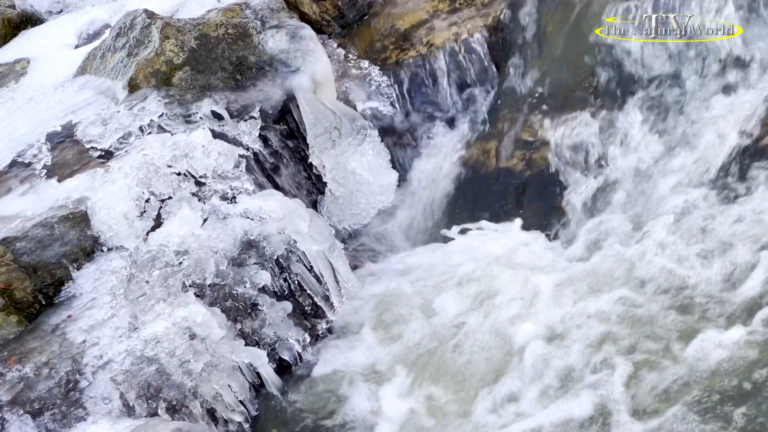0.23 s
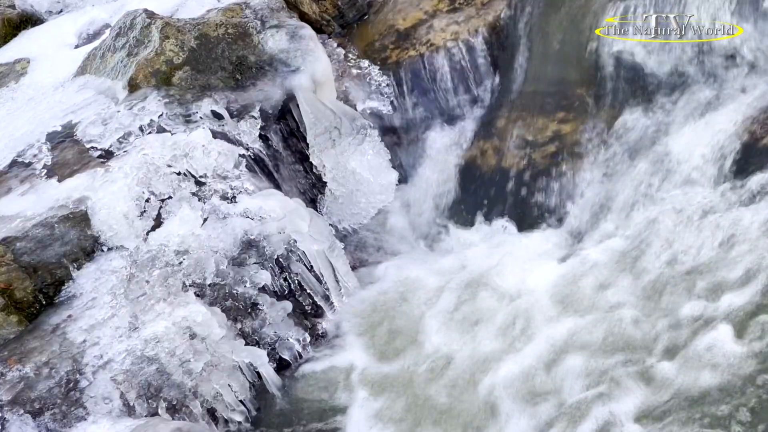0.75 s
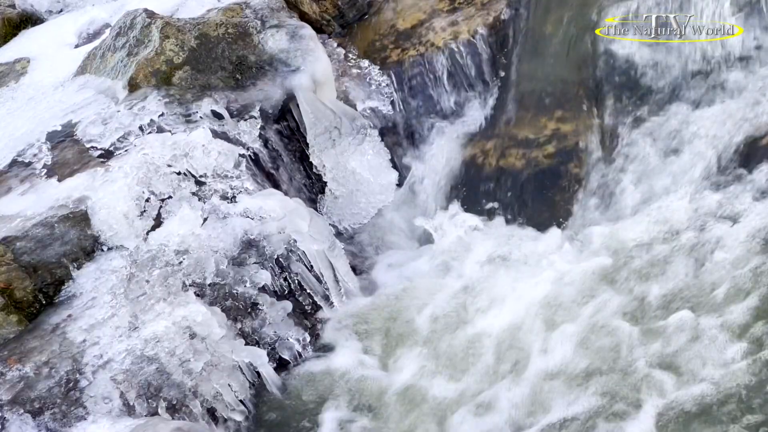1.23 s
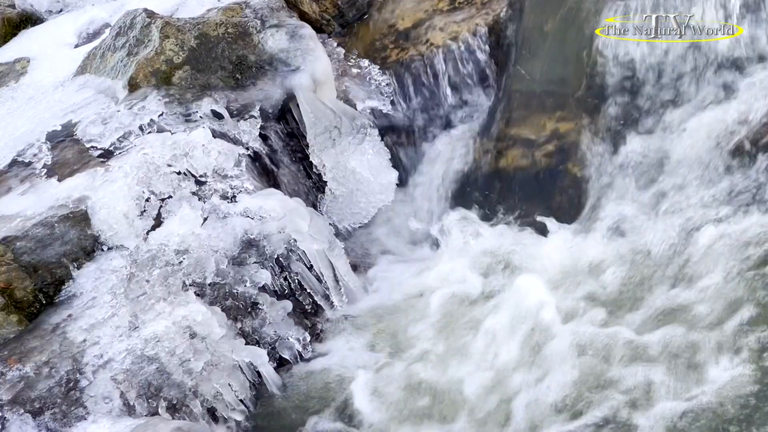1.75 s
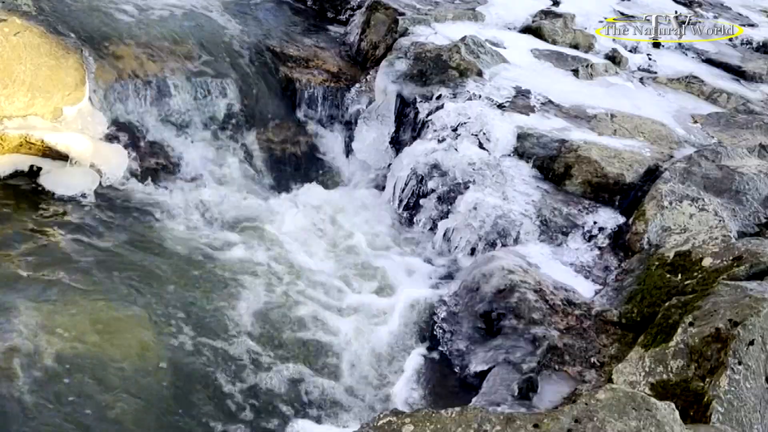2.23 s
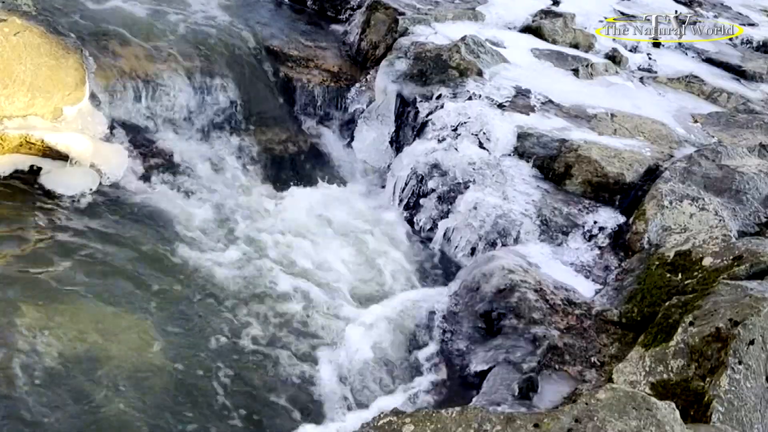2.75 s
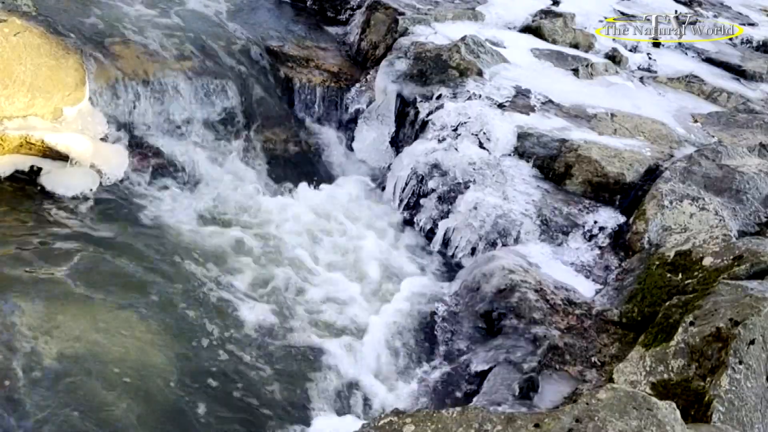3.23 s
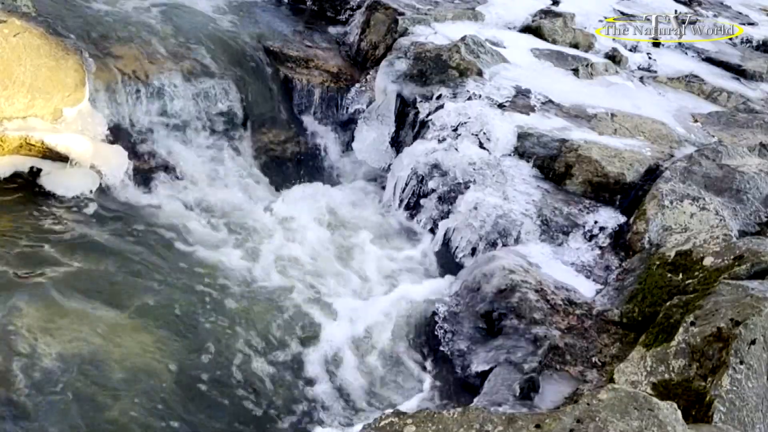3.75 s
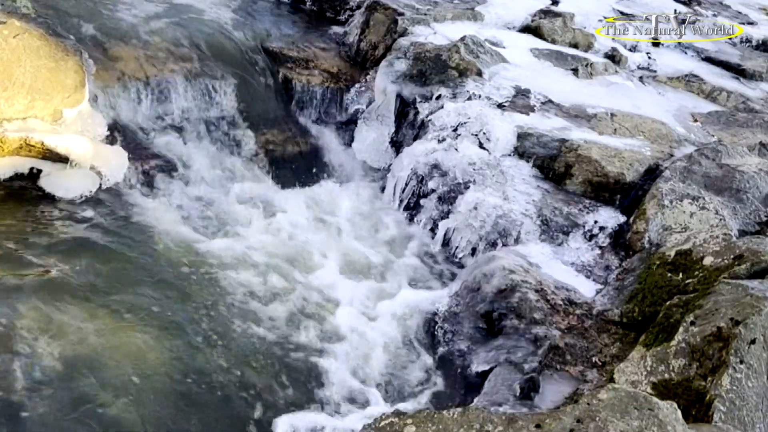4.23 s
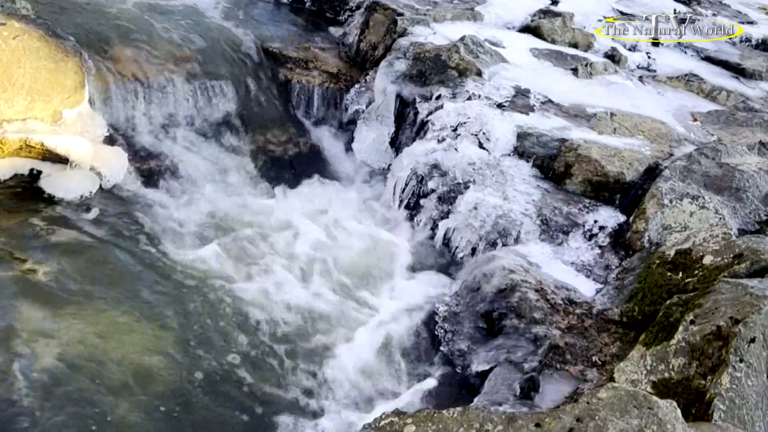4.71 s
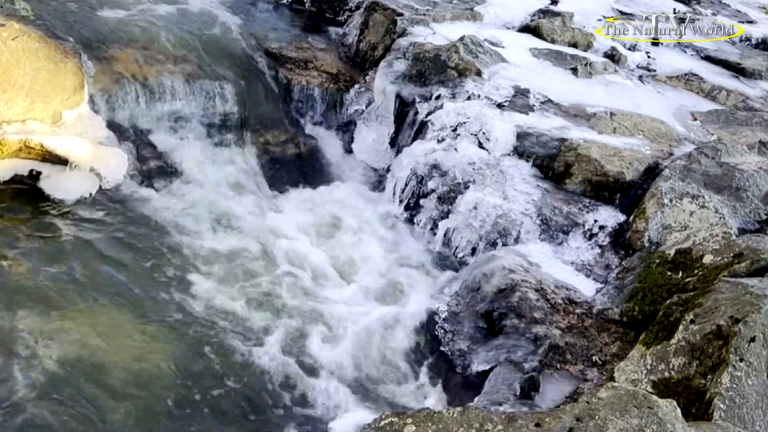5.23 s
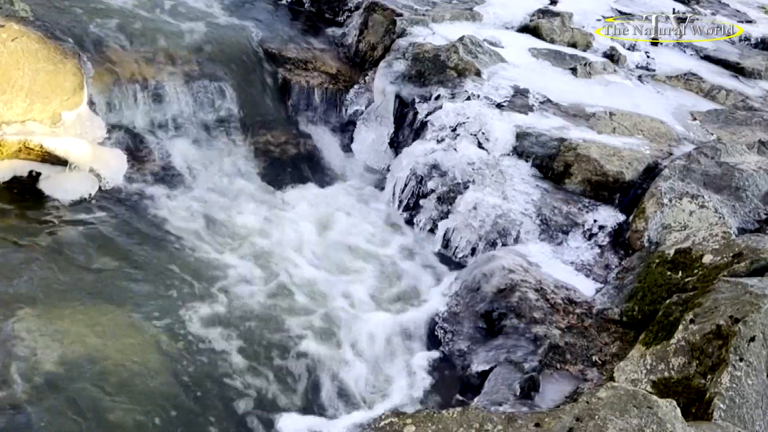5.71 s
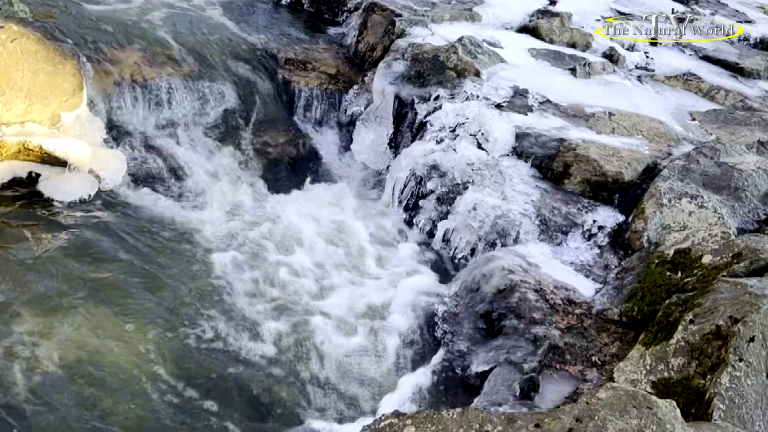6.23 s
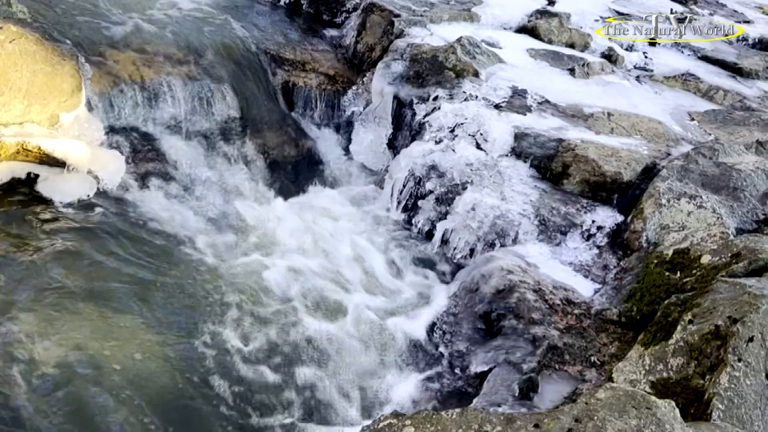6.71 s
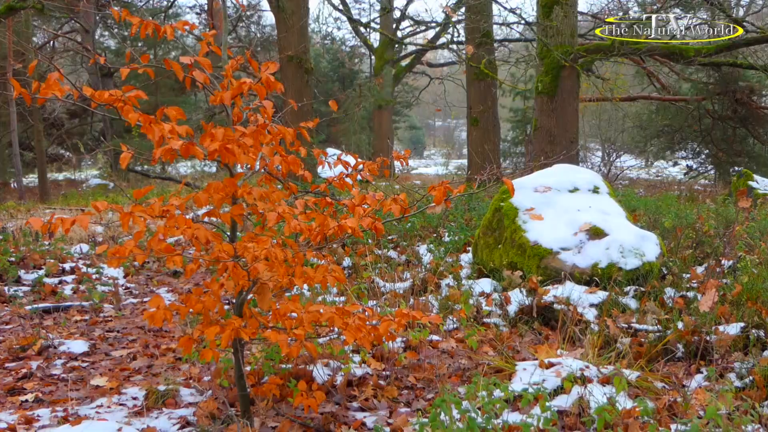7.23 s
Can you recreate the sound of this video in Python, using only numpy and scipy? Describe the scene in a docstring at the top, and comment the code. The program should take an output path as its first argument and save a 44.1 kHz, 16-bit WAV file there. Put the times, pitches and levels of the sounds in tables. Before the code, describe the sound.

A small, fast stream drops over icy rocks into a pool, heard very close and in mono. Countless bubbles gurgle and plop in the middle pitches while smaller ones tinkle brightly. Sharp droplets and little slaps on stone scatter irregularly over a continuous foamy rush, thin hiss and faint low rumble, outdoors, with only a tiny reflection from the stones.

```python
"""Bubbles gurgle, plop and tinkle where a small stream drops over icy rocks into a pool, close up, mono.
Each bubble is a damped sine whose pitch can climb; big ones gurgle, small ones tinkle.
Drops ring for a cycle or two; spray and slaps on stone are short bursts of coloured noise.
Noise also makes the foam's rush, the fine mist and the low rumble of the plunge.
A hollow between the rocks resonates, and the stones return a faint, changing echo."""
import sys
import numpy as np
from scipy import signal
from scipy.fft import rfft, irfft, next_fast_len
from scipy.io import wavfile
from scipy.ndimage import map_coordinates

SR = 44100
rng = np.random.default_rng(int(sys.argv[2]) if len(sys.argv) > 2 else 0)


def inscribe(sig):
    """Save sig as 16-bit PCM at rate SR to the path in sys.argv[1].

    A 1-D sig is mono; a 2-D sig holds one channel per row.
    Samples are clipped to [-1, 1] before scaling.
    """
    pcm = np.round(np.clip(np.atleast_2d(sig).T, -1, 1) * 32767)
    wavfile.write(sys.argv[1], SR, pcm.astype(np.int16))


N = 328986
TOP_HZ = 16300

# loudest bubbles: start_s, pitch_hz, level_db, life_cycles, rise_share_per_life
NEAR_BUBBLES = [(0.0465, 680, -23.5, 12, 0.071), (0.0854, 1410, -23.5, 15, 0.04),
                (0.118, 2031, -24, 6.7, 0.02), (0.2716, 1980, -19.5, 7, 0.01),
                (0.276, 3620, -17.5, 14, 0.0), (0.29, 623, -26, 13, 0.086), (0.346, 740, -25, 6.5, 0),
                (0.373, 913, -24, 11, 0.012), (0.454, 1430, -21, 15, 0.053), (0.5077, 502, -22, 9.1, 0.075),
                (0.543, 3000, -7.5, 5.3, 0.024), (0.544, 1770, -13.5, 4, 0.035),
                (0.561, 1080, -24, 20, 0.11), (0.568, 625, -26, 9.4, 0.032),
                (0.5864, 1705, -11, 6.7, 0.0097), (0.596, 670, -25, 9, 0.018), (0.674, 690, -23, 6.5, 0.0),
                (0.6747, 2360, -8, 8, 0.03), (0.675, 1490, -20, 7, 0.31), (0.739, 627, -29, 11, 0.02),
                (0.8208, 1450, -19.5, 8, 0.078), (0.932, 942, -16, 10.4, 0.099),
                (0.9442, 4050, -12.5, 7.5, 0.0), (0.975, 800, -15, 3.5, 0.062),
                (1.1214, 730, -24.5, 7.7, 0.0078), (1.1332, 1920, -15.5, 6, 0.0064),
                (1.1393, 917, -20, 17, 0.024), (1.162, 547, -24, 7, 0.012), (1.2324, 880, -19.5, 6, 0.11),
                (1.2362, 1416, -22.5, 20, 0.045), (1.261, 622, -22.5, 9.5, 0), (1.268, 860, -26, 11, 0.023),
                (1.3249, 680, -23, 8.8, 0.037), (1.342, 3120, -18.5, 6.7, 0.0),
                (1.3504, 599, -17.5, 10.4, 0.038), (1.393, 900, -24, 9.3, 0.1), (1.423, 980, -22, 7, 0.0),
                (1.431, 809, -15.5, 11.4, 0.047), (1.4637, 1030, -12.5, 8, 0.11),
                (1.464, 900, -23, 10, 0.02), (1.4917, 1510, -18, 12, 0.09), (1.492, 1007, -25, 18.6, 0.14),
                (1.525, 1025, -28, 13, 0.23), (1.5407, 1620, -10.5, 3.1, 0.0), (1.56, 1850, -25, 12, 0.064),
                (1.5809, 647, -15, 10, 0.0069), (1.6382, 906, -21.5, 10.5, 0.11),
                (1.71, 1540, -21.5, 9, 0.023), (1.9028, 623, -22.0, 12, 0.032),
                (1.956, 676, -27, 6, 0.0059), (1.9645, 1660, -14.5, 3.7, 0.017),
                (2.0092, 658, -16, 7.4, 0.0), (2.0532, 1000, -18.5, 7.3, 0.037),
                (2.061, 598, -25, 13, 0.075), (2.177, 2700, -18.5, 8.5, 0), (2.2903, 481, -22.5, 11, 0.21),
                (2.323, 960, -13.5, 9.1, 0.097), (2.3463, 1064, -24, 19, 0.084),
                (2.361, 1900, -20, 15, 0.065), (2.443, 1080, -22.5, 7.9, 0.031),
                (2.4596, 638, -18, 9.3, 0.011), (2.5853, 945, -19.5, 10, 0.032),
                (2.7483, 799, -20.5, 12, 0), (2.758, 1260, -19, 8.5, 0.043),
                (2.858, 878, -18.5, 9.1, 0.036), (2.859, 1800, -19.5, 5, 0), (3.031, 675, -29, 13, 0.02),
                (3.0864, 1140, -18, 5.5, 0.0), (3.206, 1117, -17, 11, 0.024),
                (3.223, 4800, -15.5, 9.2, 0.053), (3.25, 1950, -16.5, 4.4, 0.016),
                (3.303, 856, -19.5, 8.2, 0.0096), (3.331, 2340, -18.5, 5.4, 0.096),
                (3.4718, 822, -14.5, 11.3, 0.035), (3.4718, 699, -12, 11.6, 0.028),
                (3.664, 1477, -18, 9, 0.0), (3.7092, 902, -16.5, 10.5, 0.2),
                (3.7368, 2220, -13.5, 3, 0.021), (3.769, 654, -23, 8.4, 0.02),
                (3.7691, 1470, -16.5, 7.4, 0.034), (3.8093, 1058, -7.0, 11.7, 0.0065),
                (3.827, 1116, -17.5, 9.3, 0.23), (3.8713, 2620, -11, 5.9, 0.019),
                (3.8735, 633, -23, 13, 0.0), (3.987, 450, -24, 6.3, 0.11), (4.025, 625, -22, 12, 0.033),
                (4.037, 900, -21, 7.2, 0.065), (4.08, 474, -24, 5.2, 0), (4.1754, 2410, -18.5, 7, 0.01),
                (4.4018, 453, -23.5, 4.9, 0), (4.403, 2470, -22, 14, 0.0), (4.512, 705, -24.5, 6.7, 0.041),
                (4.625, 1200, -21.5, 11, 0.22), (4.6698, 678, -23.5, 12, 0.0084),
                (4.7163, 468.5, -12, 13, 0.068), (4.7248, 1710, -22.5, 12, 0.049),
                (4.726, 925, -22.5, 19, 0.048), (4.7517, 1430, -23, 14, 0.045), (4.7525, 800, -24, 14, 0.2),
                (4.7587, 606, -12, 6.4, 0.023), (4.7682, 796, -23, 15.5, 0.084), (4.783, 1490, -17.5, 9, 0),
                (4.816, 1850, -24, 16, 0.05), (4.832, 780, -19, 11, 0.024), (4.8611, 2580, -16.5, 11, 0.0),
                (4.9073, 1600, -20, 8.9, 0.041), (4.979, 1934, -18, 5.8, 0.048),
                (5.0808, 512, -20.5, 10, 0.027), (5.1046, 883, -21.0, 9.9, 0.01),
                (5.1453, 765, -25, 19.5, 0.12), (5.162, 1000, -17, 10, 0.01),
                (5.1646, 4700, -8.5, 2.6, 0.0), (5.167, 2250, -10.5, 4, 0.05), (5.174, 673, -22, 6.6, 0.21),
                (5.188, 1570, -22, 15, 0.055), (5.224, 2000, -16, 5.1, 0.0084),
                (5.254, 989, -23, 7.6, 0.0085), (5.278, 963, -23, 11, 0.22), (5.3289, 612, -6.5, 6.4, 0.0),
                (5.365, 1284, -25.5, 13, 0.15), (5.465, 1004, -19.5, 9.7, 0.03),
                (5.5063, 1410, -17, 7, 0.0), (5.537, 1530, -20, 7, 0.018), (5.5655, 2020, -9.5, 7.5, 0.0),
                (5.5863, 2050, -9, 6.8, 0.01), (5.6025, 1077, -19, 11, 0.15),
                (5.6154, 1336, -19.5, 8.4, 0.33), (5.6355, 700, -21, 5.6, 0.0),
                (5.702, 723, -20.5, 10, 0.03), (5.738, 1010, -24, 14, 0), (5.837, 826, -22, 7.8, 0.15),
                (5.883, 2530, -8, 2.6, 0.09), (5.9547, 1037, -21.0, 8.2, 0.11),
                (5.9665, 622, -14, 10.5, 0.25), (5.969, 5270, -11, 3, 0.0), (5.9802, 1140, -23, 10, 0.12),
                (5.9867, 867, -19, 14.5, 0.031), (6.01, 990, -17, 4.8, 0.21),
                (6.0454, 483, -23.5, 12.5, 0.037), (6.06, 4630, -10, 5.8, 0),
                (6.1423, 955, -19.5, 7.1, 0.062), (6.1713, 2680, -19.5, 9, 0.083),
                (6.2085, 890, -20, 12, 0.071), (6.2082, 1210, -22, 10, 0.043),
                (6.234, 2600, -19.5, 22, 0.052), (6.274, 5190, -14, 5.3, 0.06),
                (6.276, 1760, -16, 6.4, 0.014), (6.3139, 1690, -19, 11, 0.02),
                (6.3163, 4770, -20, 13, 0.02), (6.44, 1150, -19, 5.3, 0.052),
                (6.4971, 920, -19.5, 7.7, 0.12), (6.6732, 1083, -18, 8.6, 0.014),
                (6.7615, 2020, -14.5, 5, 0.071), (6.7923, 727, -22, 9.2, 0.021),
                (6.8418, 1390, -24, 22, 0.066), (6.895, 6200, -13.5, 5.9, 0.0065),
                (6.9297, 2500, -15, 10, 0.0), (6.9397, 564, -20, 8.7, 0.043),
                (6.9626, 884, -14.5, 9.2, 0.2), (6.98, 1300, -20, 12, 0.08), (6.995, 2080, -29, 11, 0.01),
                (7.0736, 505, -21.5, 11, 0.0), (7.1184, 616, -23.5, 11, 0.27),
                (7.163, 1404, -21.5, 10, 0.3), (7.1938, 1650, -22, 21, 0.038),
                (7.2427, 1440, -20.5, 12, 0.0), (7.27, 1073, -18.5, 11.6, 0.0),
                (7.282, 1360, -22, 6, 0.00024), (7.3215, 643, -18, 10.3, 0), (7.364, 1700, -22, 15, 0.05),
                (7.3868, 692, -13.5, 11.3, 0.017), (7.3876, 980, -14, 7, 0.021)]


def amp(db):
    """Decibels to gain."""
    return 10 ** (np.asarray(db) / 20)


def unit(x):
    """Scale x to rms 1."""
    return x / np.sqrt(np.mean(x ** 2) + 1e-20)


def along(points, hz):
    """Interpolate (Hz, value) points on a log-frequency axis."""
    point_hz, value = np.transpose(points)
    return np.interp(np.log(hz + 1), np.log(point_hz), value)


def wobble(knots_per_s):
    """Smooth random curve: a spline through Gaussian knots."""
    knots = rng.standard_normal(int(N * knots_per_s / SR) + 4)
    return map_coordinates(knots, [np.arange(N) * knots_per_s / SR])


def filtered(x, response):
    """Multiply the spectrum of x by response(hz)."""
    size = next_fast_len(N + SR // 4)
    hz = np.fft.rfftfreq(size, 1 / SR)
    return irfft(rfft(x, size) * response(hz), size)[:N]


def noise(spectrum):
    """Gaussian noise of rms 1, coloured by (Hz, dB) points."""
    white = rng.standard_normal(N)
    return unit(filtered(white, lambda hz: amp(along(spectrum, hz))))


def draw_times(when, surge):
    """Map uniform draws to samples, more densely where the water surges."""
    births = np.cumsum(surge)
    return np.searchsorted(births, when * births[-1])


def ring(start_s, hz, gain, cycles, rise):
    """Sum of bubbles: damped sines whose pitch changes by the share rise per life."""
    pinch_per_cycle = 2.4
    length = (6 * cycles / hz * SR).astype(int) + 1
    k = np.repeat(np.arange(len(hz)), length)  # bubble index of each sample
    age = np.arange(len(k)) - (np.cumsum(length) - length)[k]
    turns = age * hz[k] / SR
    lives = turns / cycles[k]
    # the ring sets in as the neck of air pinches off
    envelope = np.exp(-lives) * (1 - np.exp(-pinch_per_cycle * turns))
    phase = 2 * np.pi * turns * (1 + rise[k] * lives / 2)
    wave = gain[k] * envelope * np.sin(phase)
    return np.bincount((start_s * SR).astype(int)[k] + age, wave, N)[:N]


def plink(start_s, hz, db, cycles, rise):
    """Ringing bubbles, each with a short, higher snap as its neck closes."""
    snap_db, snap_ratio, snap_cycles = -15, 1.37, 1.8  # level and pitch against the bubble
    snap_life = np.full(len(start_s), snap_cycles)
    snap = ring(start_s, snap_ratio * hz, amp(db + snap_db), snap_life, rise)
    return snap + ring(start_s, hz, amp(db), cycles, rise)


def swarm(spectrum, surge, cycles, rise, spread_db, count):
    """Random bubbles of rms 1, dense in surges; cycles is the central life at the lowest pitch."""
    life_fall, rise_fall = 0.27, 1.04  # powers of pitch by which life and rise fall
    when, pitch, size, life, climb = rng.random((count, 5)).T
    start_s = draw_times(when, surge) / SR
    low, high = spectrum[0][0], spectrum[-1][0]
    hz = low * (high / low) ** pitch
    lives = cycles * 2 ** (2 * life - 1) * (low / hz) ** life_fall
    # at the lowest pitch, climbs run from -0.5 to 1.5 times rise
    rises = rise * (low / hz) ** rise_fall * (2 * climb - 1 / 2)
    # most are faint; short, high ones need more height to carry the same energy
    gain = amp(along(spectrum, hz) + spread_db * size ** 3) * hz / np.sqrt(lives)
    return unit(ring(start_s, hz, gain, lives, rises))


def drift(rows):
    """Slow level drift: 0.66 of a curve's deviation from its mean, in dB."""
    s, level_db = np.transpose(rows)
    db = np.interp(np.arange(N) / SR, s, level_db)
    return 0.66 * (db - db.mean())


def churn_drift():
    """The pool's churning drifts slowly, and the fall sloshes irregularly: dB per sample."""
    # time_s, level_db (only the deviation is used)
    churn = [(0.0, -33), (0.58, -35.5), (0.89, -37), (1.45, -32), (1.78, -32.5), (2.26, -31.5),
             (2.62, -34.5), (2.89, -35.5), (3.7, -37), (3.86, -30), (4.28, -36.5), (4.82, -32.5),
             (6.75, -32), (7.46, -36)]
    slosh_knots_per_s, slosh_db = 10, 1
    return drift(churn) + slosh_db * wobble(slosh_knots_per_s)


def spray_drift():
    """The spray drifts slowly, and sloshes irregularly with a random curve of its own: dB per sample."""
    # time_s, level_db (only the deviation is used)
    spray = [(0.0, -42), (2.41, -36), (3.07, -43), (3.35, -40), (4.17, -38.5), (4.62, -39), (5.09, -35.5),
             (5.53, -44.5), (5.77, -36.5), (6.54, -36.5), (7.46, -36.5)]
    slosh_knots_per_s, slosh_db = 10, 1.75
    return drift(spray) + slosh_db * wobble(slosh_knots_per_s)


def splashes():
    """Handfuls of spray slap onto the stones: a quick lift that sinks back, dB per sample."""
    # peak_s, spatter_lift_db
    handfuls = [(0.23, 5), (0.5, 10), (0.69, 4), (1.17, 5), (1.445, 12), (1.58, 12), (2.85, 7), (3.145, 7),
                (3.25, 10), (3.33, 7), (3.765, 5), (4.34, 7), (4.63, 10), (5.455, 9), (5.79, 7), (5.97, 6),
                (6.25, 6), (6.44, 7)]
    rise_s, fall_s = 0.037, 0.032
    s, lift_db = np.transpose(handfuls)
    kicks = np.bincount((s * SR).astype(int), lift_db, N)[:N]
    t = np.arange(-(SR // 4), SR // 4 + 1) / SR
    swell = np.exp(-np.abs(t) / np.where(t < 0, rise_s, fall_s))
    return signal.fftconvolve(kicks, swell, mode="same")


def rumble():
    """The plunge rumbles as steady low noise of rms 1."""
    # freq_hz, density_db
    spectrum = [(10, -1.5), (25, -1.5), (50, -0.5), (100, -1.5), (160, -6), (260, -10.5), (400, -13.5),
                (900, -44), (3000, -74)]
    return noise(spectrum)


def mist():
    """The finest spray hisses evenly: bright noise of rms 1."""
    # freq_hz, density_db
    spectrum = [(2500, -7), (5000, 0), (9500, -4.5), (12000, -10), (15000, -19)]
    return noise(spectrum)


def foam(surge):
    """Countless farther bubbles merge into a surging, fluttering noise of rms 1."""
    # freq_hz, density_db
    spectrum = [(250, -16), (420, -17), (650, -0.5), (1050, 7.5), (2400, -6.5), (3300, -17), (5200, -18),
                (7000, -20.5), (9500, -17), (12000, -33), (15000, -52)]
    return unit(noise(spectrum) * np.sqrt(surge) * amp(4.6 * wobble(120)))


def hollow(x):
    """The gap between the rocks resonates at one low pitch: a second-order band-pass."""
    # pitch_hz, width_hz, peak_gain
    resonance = (662, 40, 0.74)
    hz, width, gain = resonance
    return gain * filtered(x, lambda f: 1j * f * width / (hz ** 2 - f ** 2 + 1j * f * width))


def spatter(surge, life_s=0.001, wet=0.65, wet_life_s=0.0039, spread_db=19.0, count=1500):
    """Drops burst on stone and water: a sharp noise tick and a brief wet sizzle, rms 1."""
    when, size = rng.random((count, 2)).T
    hits = np.bincount(draw_times(when, surge), amp(spread_db * size ** 3), N)
    t = np.arange(SR // 40) / SR
    burst = np.exp(-t / life_s) + wet * np.exp(-t / wet_life_s)
    # separate drops add in power
    power = np.abs(signal.fftconvolve(hits ** 2, burst ** 2)[:N])
    spectrum = [(400, -29), (1200, 0.0), (3000, 2.0), (5500, -6.5), (7000, -6.5),
                (9500, -8.0), (12000, -18.0), (15000, -21)]
    return unit(np.sqrt(power) * noise(spectrum))


def tinkle(surge):
    """Tiny bubbles left by falling droplets ring high and briefly."""
    # pitch_hz, relative_level_db
    spectrum = [(2200, 0.5), (3000, 0), (3800, -0.5), (5200, 2), (6800, -6), (9000, -5), (11000, -17),
                (12500, -21)]
    return swarm(spectrum, surge, cycles=4.2, rise=0.01, spread_db=19, count=9000)


def gurgle(surge):
    """The crowd of middle-sized bubbles under the fall rings longer and mostly climbs."""
    # pitch_hz, relative_level_db
    spectrum = [(330, -17.5), (420, -22.5), (480, 1.5), (550, -10.5), (630, 7.5), (800, 2), (1050, 0.5),
                (1400, -2), (2400, -3.5), (3200, -15)]
    return swarm(spectrum, surge, cycles=10.5, rise=0.13, spread_db=13, count=3100)


def slaps(trim_db):
    """Water slaps flat on stone: bright noise cracks that decay with a life of a millisecond."""
    # start_s, level_db (before trim)
    cracks = [(0.2724, -25), (0.291, -33), (0.4952, -19), (0.674, -21), (1.173, -18.5), (1.216, -28),
              (1.508, -19), (1.596, -16), (2.1462, -22), (3.127, -24), (3.1535, -27), (3.585, -22),
              (4.617, -19), (5.586, -22.5), (6.054, -18), (6.248, -20), (6.281, -25)]
    # freq_hz, density_db
    spectrum = [(600, -3), (2500, 1.5), (10500, 0.5), (15000, -12)]
    life_s = 0.001
    s, db = np.transpose(cracks)
    hits = np.bincount((s * SR).astype(int), amp(db + trim_db), N)[:N]
    fade = np.exp(-np.arange(SR // 40) / SR / life_s)
    return signal.fftconvolve(hits, fade)[:N] * noise(spectrum)


def near_drops(trim_db, count=3):
    """Heavy drops ring for a cycle or two; the droplets they throw up land just after."""
    # start_s, pitch_hz, level_db (before trim)
    drops = [(0.2197, 4800, -17), (0.2222, 5300, -14.5), (0.4526, 4150, -10), (0.4908, 5870, -8),
             (0.833, 3610, -15.5), (1.093, 8300, -22), (1.2162, 2980, -15), (1.4434, 2363, -16.5),
             (1.585, 5050, -28), (2.147, 5690, -17), (2.2572, 10000, -10.5), (2.8493, 8500, -12.5),
             (3.763, 7950, -13.5), (3.857, 3730, -12), (3.9548, 3440, -15.5), (4.3474, 8100, -12),
             (4.609, 4570, -21), (4.619, 8040, -17), (4.975, 3740, -16), (5.439, 9100, -13),
             (5.4624, 4640, -9), (5.48, 8200, -12), (5.749, 9000, -15.5), (6.0616, 2700, -13),
             (6.444, 8100, -17), (6.6913, 3700, -14.5), (6.79, 4960, -16), (6.857, 4270, -17.5),
             (7.315, 5090, -21)]
    life_cycles, rise = 2.4, 0.0072
    rebound_db, rebound_s = -14.5, 0.0072  # level against the drop, latest landing

    def tick(start_s, pitch_hz, db):
        lives = np.full(len(start_s), life_cycles)
        rises = np.full(len(start_s), rise)
        return ring(start_s, pitch_hz, amp(db + trim_db), lives, rises)

    s, hz, db = np.transpose(drops)
    late, size = rng.random((len(s) * count, 2)).T
    droplet_s = np.repeat(s, count) + rebound_s * late
    droplet_hz = np.repeat(hz, count) * 2 ** (size - 1 / 4)
    droplets = tick(droplet_s, droplet_hz, np.repeat(db, count) + rebound_db)
    return tick(s, hz, db) + droplets


def wakes(scatter_db=3, rise=0.052, cycles=8.6, most_db=-14, count=2):
    """Each big bubble sheds smaller ones, limited in strength; later ones tend to ring higher."""
    wake_db, wake_s, reach_octaves = -16.5, 0.045, 1.7
    s, hz, db, _, _ = np.repeat(NEAR_BUBBLES, count, axis=0).T
    late, size, loud = rng.random((len(s), 3)).T
    small_hz = np.minimum(hz * 2 ** (reach_octaves * (2 * late + size) / 3), TOP_HZ)
    small_db = np.minimum(db, most_db) + wake_db + scatter_db * (2 * loud - 1)
    return plink(s + wake_s * late, small_hz, small_db, np.full(len(s), cycles), rise * size)


def near_bubbles():
    """Single air pockets plop and plink; just under the surface they radiate little bass."""
    # freq_hz, gain_db
    surface = [(100, -12), (250, -5), (430, -0.5)]
    return filtered(plink(*np.transpose(NEAR_BUBBLES)), lambda hz: amp(along(surface, hz)))


def rocks(x, life_s=0.002, count=9):
    """Stones and waves scatter a short echo that changes as the surface moves."""
    t = np.arange(SR // 32) / SR
    tails = rng.standard_normal((count, len(t))) * np.exp(-t / life_s) * (t > .001)
    tails /= np.linalg.norm(tails, axis=1, keepdims=True)
    # crossfade between sets of reflections at equal power
    shape = np.clip((count - 1) * (1 / 2 + wobble(10) / 4), 0, count - 1)
    shares = np.sqrt(np.maximum(1 - np.abs(shape - np.arange(count)[:, None]), 0))
    echo = signal.oaconvolve(x * shares, tails, axes=1).sum(axis=0)[:N]
    return filtered(echo, lambda hz: amp(along([(600, -8.5), (2500, 0.5)], hz)))


def scene():
    """Quick surges of the fall drive bubbles, spray and foam together."""
    churn_db, spray_db, splash_db = churn_drift(), spray_drift(), splashes()
    surge = amp(1.5 * wobble(28) + 2.2 * wobble(110))
    near = near_bubbles()
    # the foam follows 0.56 of the splash lift
    rush = amp(churn_db + 0.56 * splash_db - 45.0) * foam(surge)
    hum = hollow(rush + amp(-24) * near)
    pool = amp(churn_db - 35.07) * gurgle(surge) + rush + hum
    spray = amp(spray_db - 41.0) * tinkle(surge)
    spray += amp(spray_db + splash_db - 43.5) * spatter(surge)
    spray += amp(-57) * mist()
    plunge = amp(-48.5) * rumble()
    impacts = near_drops(trim_db=4.0) + slaps(trim_db=-1.5)
    water = near + wakes() + impacts + pool + spray + plunge
    heard = water + amp(-10.0) * rocks(water)
    return np.array([heard, heard])


def record(dry):
    """The microphone softens the top treble; nothing passes from TOP_HZ up."""
    # freq_hz, gain_db
    microphone = [(9500, 0.5), (12000, 0.5), (14000, -4), (16000, -20)]
    response = lambda hz: amp(along(microphone, hz)) * (hz < TOP_HZ)
    return np.array([filtered(side, response) for side in dry])


dry = scene()
out = record(dry)
inscribe(out)
```